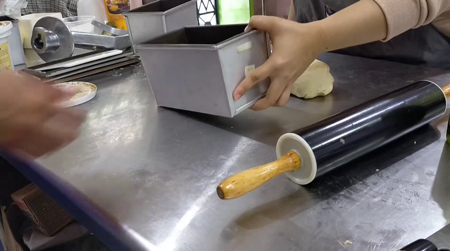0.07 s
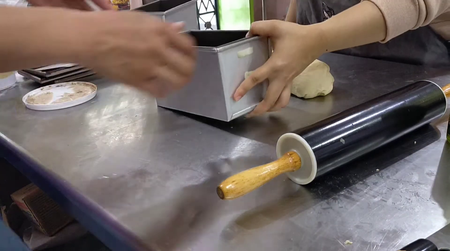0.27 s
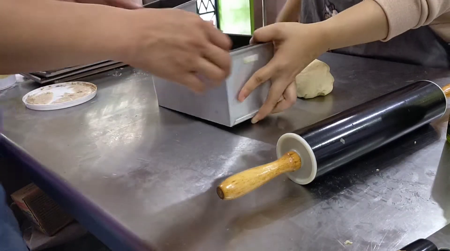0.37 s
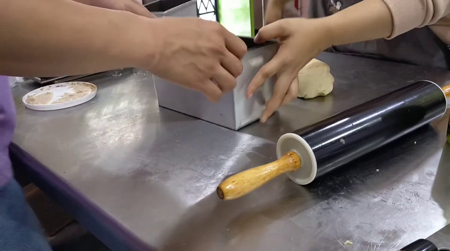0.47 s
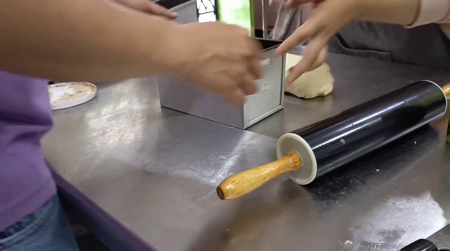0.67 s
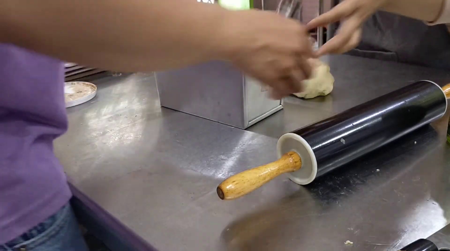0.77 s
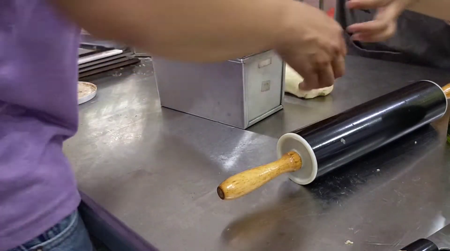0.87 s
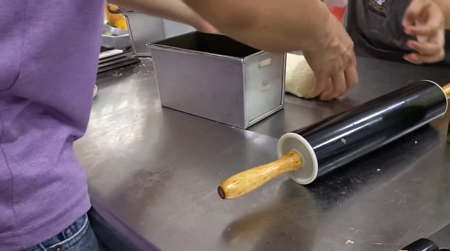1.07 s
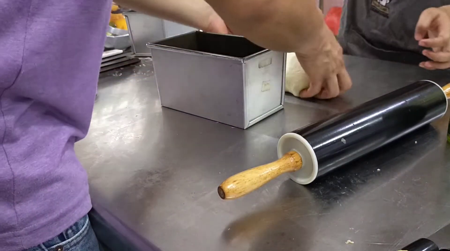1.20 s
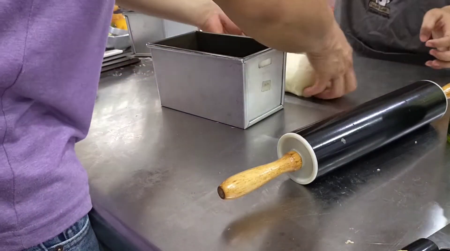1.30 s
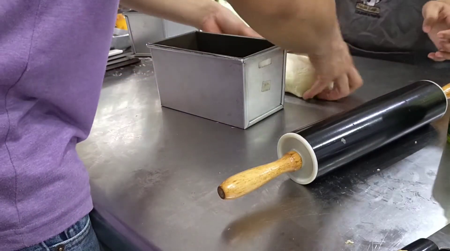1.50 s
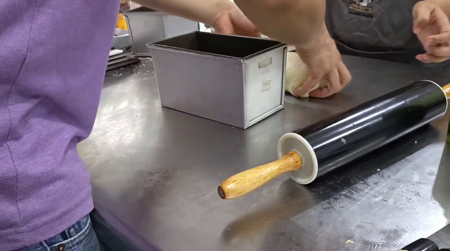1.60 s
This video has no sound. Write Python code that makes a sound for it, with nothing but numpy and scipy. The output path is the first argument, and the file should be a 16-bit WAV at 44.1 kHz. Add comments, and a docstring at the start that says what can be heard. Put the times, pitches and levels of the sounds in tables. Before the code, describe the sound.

Metal baking tin knocks and lands on a stainless-steel table, ringing shortly in a hard kitchen

```python
"""A metal loaf tin knocks twice on a stainless-steel worktable, is set down flat and slides a little.
Struck decaying modes ring its base, walls and the tabletop; shaped noise makes the rim's chatter and
the scrape, with a wavering tone for the singing base. A hard bakery kitchen adds reverberation.
Ventilation, rumble and machine hum run behind, with noise-burst ticks and one thin, high squeak."""
import sys
import numpy as np
from scipy import signal
from scipy.fft import rfft, irfft, next_fast_len
from scipy.io import wavfile
from scipy.ndimage import map_coordinates

SR = 44100
rng = np.random.default_rng(int(sys.argv[2]) if len(sys.argv) > 2 else 0)


def store_pcm(level_fs):
    """Save levels as 16-bit WAV."""
    pcm = np.round(np.clip(level_fs, -1, 1) * 32767).astype(np.int16)
    wavfile.write(sys.argv[1], SR, np.atleast_2d(pcm).T)


N = 72765

# ventilation noise, relative spectrum: pitch_hz, level_db
AIR_SPECTRUM = [(20, 2.5), (90, -5), (140, -3.5), (215, -6), (270, -13.5), (400, -10), (800, -9.5),
                (1700, -13.5), (2500, -13), (3500, -19.5), (6000, -32), (8300, -29), (11000, -40.5),
                (15700, -29)]
# ventilation level over time: time_s, level_db
AIR_LEVEL = [(0, -53.5), (.5, -48), (.85, -49), (1.25, -48), (1.55, -50.5), (1.65, -51.5)]
# low rumble, relative spectrum: pitch_hz, level_db
RUMBLE_SPECTRUM = [(25, -14), (45, -4), (90, -6.5), (135, -3.5), (210, -8), (300, -14.5), (700, -38.5)]
# rumble level over time: time_s, level_db
RUMBLE_LEVEL = [(0, -60), (.85, -61), (1.05, -55), (1.25, -56.5), (1.45, -53.5), (1.65, -53.5)]
# machine hum: pitch_hz, level_db, unsteadiness_db
HUM_TONES = [(35.4, -53, 4), (64.1, -56, 2.5)]
# light handling ticks: start_s, level_db, centre_hz
TICKS = [(0.057, -48, 2600), (.092, -49.5, 2270), (0.212, -43, 2350), (0.506, -42.5, 1390),
         (0.511, -52, 8040), (1.037, -52, 2500), (1.121, -47, 700), (1.12, -58, 13000),
         (1.312, -54.5, 1290), (1.495, -71, 12000)]
# touches of the rim: start_s, clatter_db, click_db, bass_weight_db
RIM_CONTACTS = [(.155, -28, -34, -12), (0.1569, -42, -29, 3), (.162, -29.5, -28, 7),
                (0.165, -38.5, -26.5, 1), (.368, -36, -31.5, -11), (0.3701, -29, -31, -0.5),
                (.382, -35.5, -59, 16), (0.4039, -37.5, -67, 12), (0.5531, -23.5, -43, 6.5),
                (.5597, -29, -14, 5.5), (0.5684, -30.5, -36, 10), (0.5835, -32.5, -52, -1),
                (0.5946, -35, -52, 9)]
# sheet-metal clatter, relative spectrum: pitch_hz, level_db
CLATTER_SPECTRUM = [(40, -19.5), (200, -15), (400, -12), (560, -3), (820, -7), (950, 0), (1300, -3.5),
                    (1580, -2.5), (1900, -7), (2500, -7.5), (3300, -14.5), (4700, -15), (6000, -19),
                    (16000, -22)]
# decay of the clatter: pitch_hz, t60_s
CLATTER_T60 = [(100, 0.26), (600, 0.097), (2000, 0.12), (12000, 0.038)]
# sharp click of the rim, relative spectrum: pitch_hz, level_db
CLICK_SPECTRUM = [(300, -1), (2000, -15), (4500, -6), (6200, -4), (8100, 3), (9500, -4.5), (12000, -4.5),
                  (15700, 7)]
# landings of the tin: start_s, base_db, clank_hz, clank_db, walls_db, table_db
LANDINGS = [(.157, -31.5, 551, -28, -31, -60), (0.3709, -33, 604, -26.5, -32.5, -50),
            (0.5538, -22, 514, -18.5, -31.5, -21)]
# modes of the tin's base: pitch_hz, relative_level_db, t60_s
BASE_MODES = [(524, 0, .22), (548, -7, .15)]
# modes of the tin's walls: pitch_hz, relative_level_db, t60_s
WALL_MODES = [(205, -15, .25), (764, -14, .25), (925, -9, .13), (1143, -6, .22), (1358, -11, .2),
              (1596, -3, .13), (1863, -13, .2), (2230, -13, .22), (2415, -15, .26), (4200, -17, .2),
              (4850, -13, .09), (8400, -20, .11)]
# modes of the tabletop: pitch_hz, relative_level_db, t60_s
TABLE_MODES = [(62, -22, .15), (120, -17, .06), (292, -15, .17), (327, -15, .17), (420, -6, .21),
               (490, -6, .06), (638, -11, .15), (972, -13, .18), (1078, -14, .18), (1203, -11, .21),
               (1445, -8, .19), (1530, -7, .07), (2545, -18, .25)]
# level of the sliding scrape over time: time_s, level_db
SLIDE_LEVEL = [(.6, -60), (.652, -40.5), (.735, -43), (.77, -46.5), (.86, -51), (1.05, -59.5), (1.3, -85)]
# scrape, relative spectrum: pitch_hz, level_db
SCRAPE_SPECTRUM = [(100, -42), (320, -1), (430, -9), (560, -7), (720, -9.5), (1100, -14.5), (2500, -12.5),
                   (5600, -21), (6800, -24), (8200, -17), (10500, -26.5), (15700, -29)]
# pulses of the squeak: peak_s, level_db, half_length_s
SQUEAK_PULSES = [(1.019, -59.5, 0.021), (1.054, -48, 0.011), (1.097, -54, 0.021), (1.12, -55, 0.0049),
                 (1.169, -57.5, 0.0092), (1.225, -80, 0.04)]
# reverberation time of the kitchen: pitch_hz, t60_s
ROOM_T60 = [(100, 0.43), (500, 0.51), (2500, 0.42), (8000, 0.47), (15000, 0.56)]
# level of a faint treble stereo side: pitch_hz, level_db
SIDE_LEVEL = [(2000, -80), (3300, -68), (4500, -24), (8500, -18), (13000, -27)]

TICK_T60_S = 0.076
WEIGHT_HZ = 470  # a heavier touch adds sound below this
CLICK_T60_S = 0.01
SHIMMER_DB, SHIMMER_T60_S = -11, 0.17  # thin ring of high modes after the click
CLANK_T60_S = 0.081  # the struck corner's note is damped by the hand
SING_HZ, SING_WIDTH_HZ, SING_DB = 521, 12, -1  # main resonance of the base under sliding; dB re scrape
SQUEAK_HZ, SQUEAK_WANDER_HZ = 10444, 35
ROOM_DB = -7.5
BASE_ROOM_DB = -18  # base and singing are sent faintly to the room, so their ring stays clear and steady
SIDE_T60_S = 0.014  # length of the decorrelating noise
TOP_HZ = 15900


def amp(db):
    """Level: decibels to amplitude gain."""
    return 10 ** (np.asarray(db) / 20)


def unit(x):
    """Normalisation: scale to rms 1."""
    return x / np.sqrt(np.mean(x ** 2) + 1e-20)


def along(points, hz):
    """Logarithmic pitch scale: read (Hz, value) points between their frequencies."""
    f, v = np.transpose(points)
    return np.interp(np.log(hz + 1), np.log(f + 1), v)


def clock():
    """Sampling: the time of every sample in seconds."""
    return np.arange(N) / SR


def wobble(rate):
    """Slow random modulation: a smooth curve through `rate` random knots a second."""
    knots = rng.standard_normal(int(N * rate / SR) + 4)
    return map_coordinates(knots, [clock() * rate])


def filtered(x, response):
    """Linear filtering: multiply the spectrum by a response of frequency."""
    m = next_fast_len(N + SR // 2)
    spectrum = rfft(x, m) * response(np.fft.rfftfreq(m, 1 / SR))
    return irfft(spectrum, m)[..., :N]


def noise(spectrum):
    """Spectral shaping: white noise coloured by a table, at rms 1."""
    return unit(filtered(rng.standard_normal(N), lambda hz: amp(along(spectrum, hz))))


def fade(t, t60):
    """Exponential damping: a fall of 60 dB in t60 seconds."""
    return np.exp(-np.log(1000) * t / t60)


def dying(x, t60s):
    """Frequency-dependent damping: each band dies at its own speed."""
    hz, t, z = signal.stft(x, SR, nperseg=256)
    damped = z * fade(t, along(t60s, hz)[:, None])
    return signal.istft(damped, SR, nperseg=256)[1][:N]


def add(track, s, sound):
    """Superposition: mix a sound in from time s."""
    start = round(s * SR)
    track[start:] += sound[:N - start]


def kitchen():
    """Steady background: broadband ventilation, low rumble and a machine's hum of wavering tones."""
    t = clock()
    air_db = np.interp(t, *np.transpose(AIR_LEVEL)) + 0.35 * wobble(39.57)
    air = amp(air_db) * noise(AIR_SPECTRUM)
    rumble = amp(np.interp(t, *np.transpose(RUMBLE_LEVEL))) * noise(RUMBLE_SPECTRUM)
    hum = np.zeros(N)
    for hz, db, sway_db in HUM_TONES:
        sway = amp(sway_db * wobble(8))
        tone = np.sin(2 * np.pi * hz * t + 0.84 * wobble(9.55))
        hum += amp(db) * unit(sway * tone)
    return air + rumble + hum


def ticks():
    """Damped impact: hands and utensils make small noise bursts, each peaked at a centre frequency."""
    out = np.zeros(N)
    for s, db, hz in TICKS:
        peak = [(hz / 4, -22), (hz, 0), (hz * 4, -32)]
        add(out, s, amp(db) * fade(clock(), TICK_T60_S) * noise(peak))
    return out


def chatter():
    """High modal density: each rim touch clicks and stirs crowded, short-lived sheet-metal modes."""
    out, t = np.zeros(N), clock()
    for s, clatter_db, click_db, weight_db in RIM_CONTACTS:
        click_decay = fade(t, CLICK_T60_S) + amp(SHIMMER_DB) * fade(t, SHIMMER_T60_S)
        click = noise(CLICK_SPECTRUM) * click_decay
        sheet = filtered(noise(CLATTER_SPECTRUM), lambda hz: amp(weight_db / (1 + (hz / WEIGHT_HZ) ** 4)))
        clatter = dying(sheet, CLATTER_T60)
        add(out, s, amp(clatter_db) * clatter + amp(click_db) * click)
    return out


def ring(modes, rough, attack_s):
    """Modal synthesis: damped sinusoids, their phases slightly unsteady as the contact shifts."""
    t = clock()
    tones = np.zeros(N)
    for hz, db, t60 in modes:
        phase = 2 * np.pi * hz * t + rough * wobble(97)  # rough in radians
        tones += amp(db) * fade(t, t60) * np.sin(phase)
    return -tones * (1 - np.exp(-t / attack_s))


def landings():
    """Impact excitation: landings clank and ring base and walls; only full weight booms the tabletop."""
    base, panels = np.zeros(N), np.zeros(N)
    for s, base_db, clank_hz, clank_db, walls_db, table_db in LANDINGS:
        # the clank's pitch depends on how the tin lands
        clank = ring([(clank_hz, clank_db, CLANK_T60_S)], rough=0.3, attack_s=0.0023)
        base_ring = amp(base_db) * ring(BASE_MODES, rough=0.21, attack_s=0.0013)
        walls = amp(walls_db) * ring(WALL_MODES, rough=0.22, attack_s=0.0012)
        table = amp(table_db) * ring(TABLE_MODES, rough=0.23, attack_s=0.0013)
        add(base, s, clank + base_ring)
        add(panels, s, walls + table)
    return base, panels


def slide():
    """Friction excitation: tiny uneven slips scrape and keep the base's main resonance singing."""
    stroke = amp(np.interp(clock(), *np.transpose(SLIDE_LEVEL)))
    slips = unit(amp(1.1 * wobble(350)))
    scrape = slips * noise(SCRAPE_SPECTRUM)
    pitch_hz = SING_HZ + SING_WIDTH_HZ / 2 * wobble(40.1)
    tone = np.sin(2 * np.pi * np.cumsum(pitch_hz) / SR)
    sing = unit(amp(2 * wobble(40)) * tone)
    grip = stroke / stroke.max()  # the note needs pressure, so it fades sooner than the scrape
    return stroke * scrape, amp(SING_DB) * stroke * grip * sing


def squeak():
    """Amplitude and frequency modulation: a thin, high tone swells in a few uneven pulses."""
    t = clock()
    level = sum(amp(db) * np.exp(-((t - s) / half) ** 2) for s, db, half in SQUEAK_PULSES)
    pitch_hz = SQUEAK_HZ + SQUEAK_WANDER_HZ * wobble(99)
    # a sine of amplitude sqrt(2) has rms 1
    return np.sqrt(2) * level * np.sin(2 * np.pi * np.cumsum(pitch_hz) / SR)


def room(x):
    """Reverberation: the hard walls answer with a diffuse tail that builds up over some 13 ms."""
    build_up = 1 - np.exp(-(clock() / 0.013) ** 2)
    tail = dying(rng.standard_normal(N), ROOM_T60) * build_up
    return signal.fftconvolve(x, tail / np.linalg.norm(tail))[:N]


def treble_side(source):
    """Decorrelation: a short noise response makes a faint treble stereo side."""
    response = rng.standard_normal(N) * fade(clock(), SIDE_T60_S)
    decorrelated = signal.fftconvolve(source, response / np.linalg.norm(response))[:N]
    return filtered(decorrelated, lambda hz: amp(along(SIDE_LEVEL, hz)))


def scene():
    """Middle-side stereo: nearly everything is in the middle, with a faint treble side."""
    rim = chatter()
    base, panels = landings()
    scrape, sing = slide()
    low = base + sing
    bright = panels + rim + scrape + ticks() + squeak()
    reverberation = room(amp(ROOM_DB) * bright + amp(BASE_ROOM_DB) * low)
    mid = low + bright + reverberation + kitchen()
    side = treble_side(rim)
    return np.array([mid + side, mid - side])


def record(dry):
    """Band limitation: nothing passes at or above the top frequency."""
    return filtered(dry, lambda hz: hz < TOP_HZ)


dry = scene()
out = record(dry)
store_pcm(out)
```